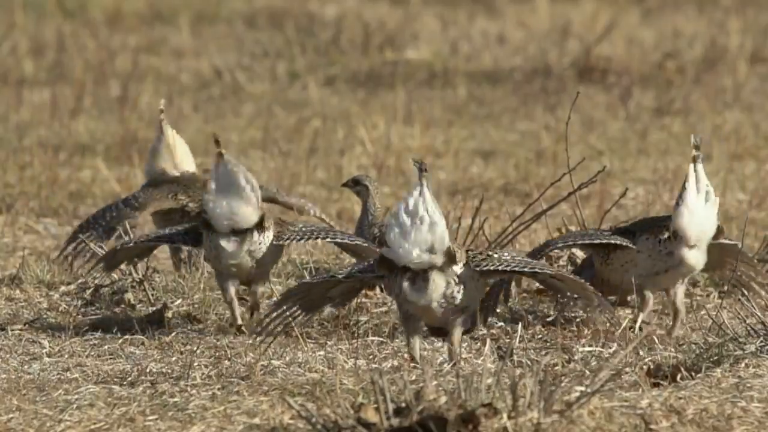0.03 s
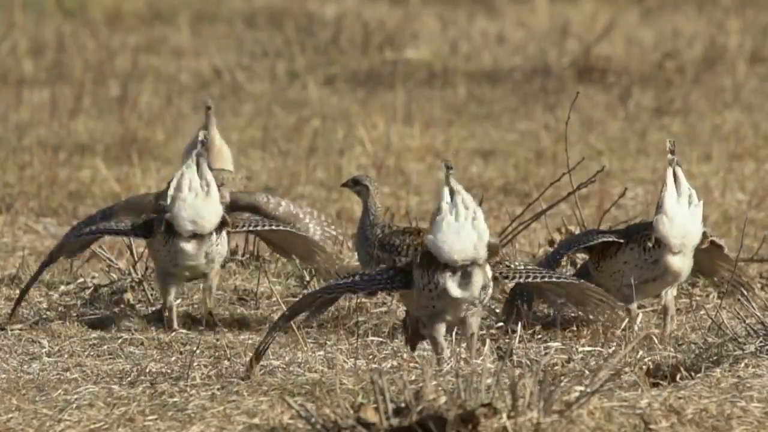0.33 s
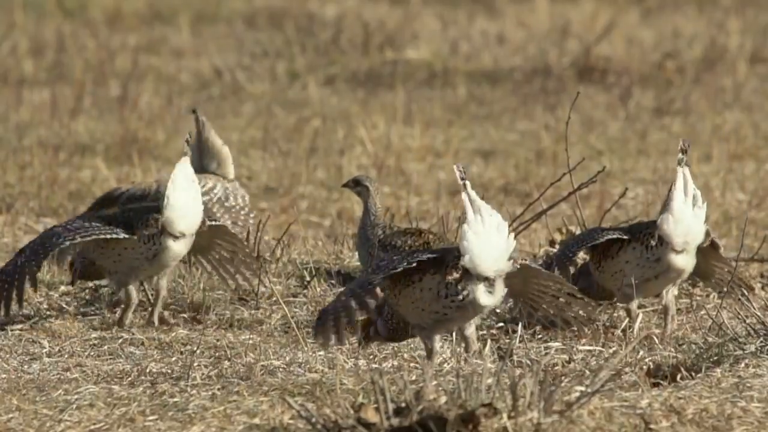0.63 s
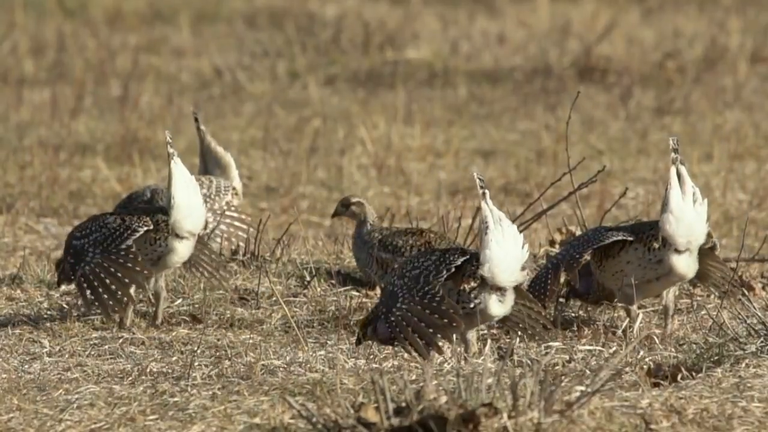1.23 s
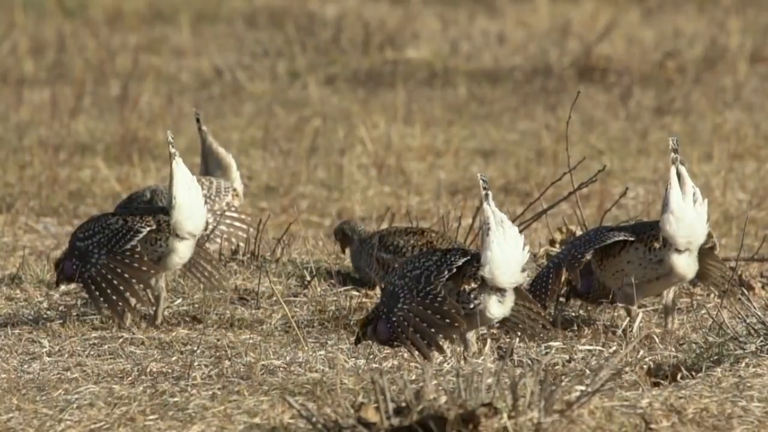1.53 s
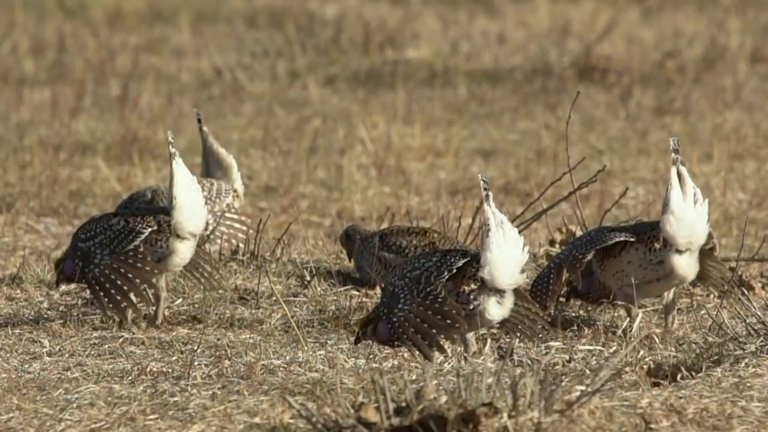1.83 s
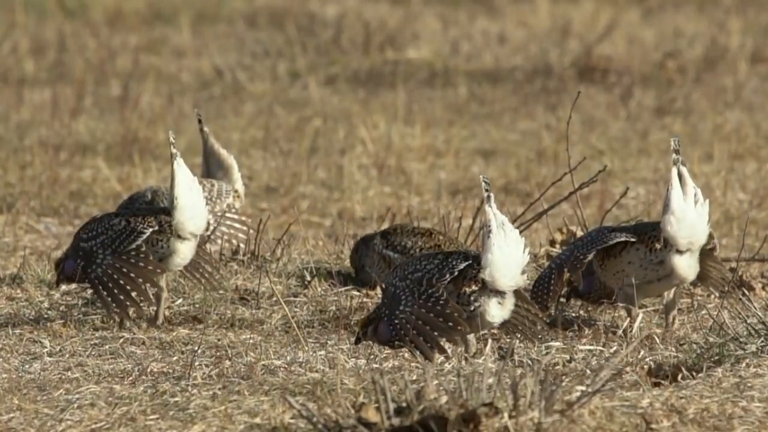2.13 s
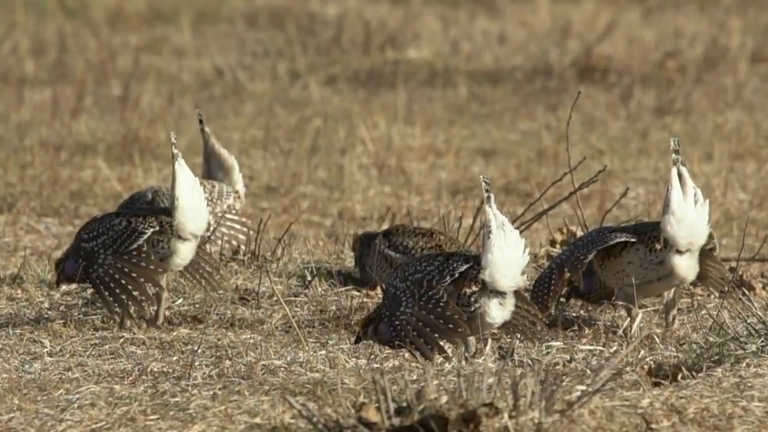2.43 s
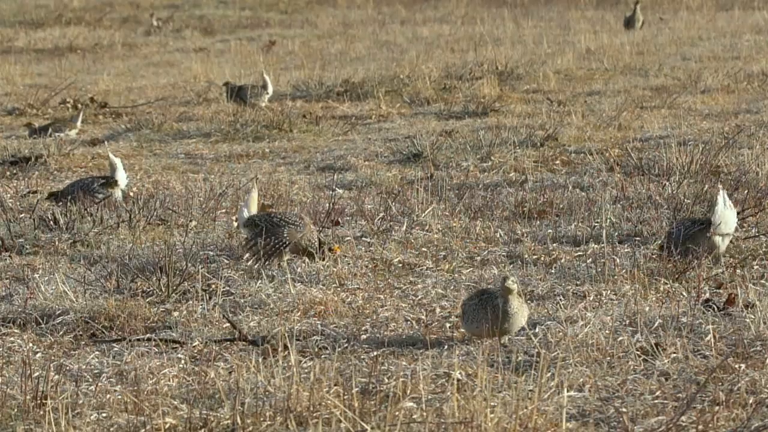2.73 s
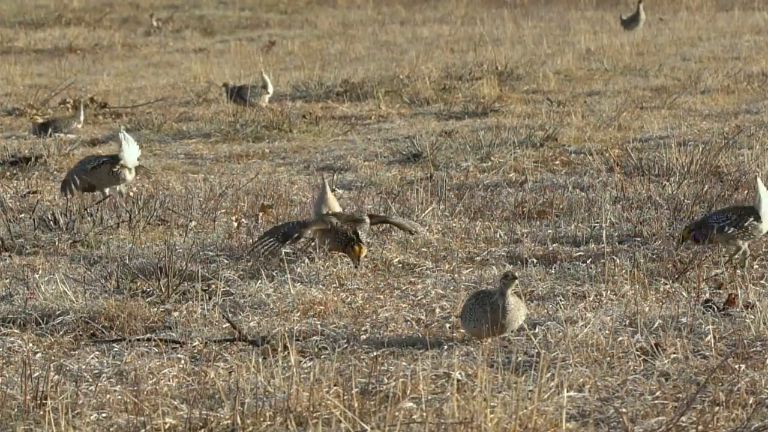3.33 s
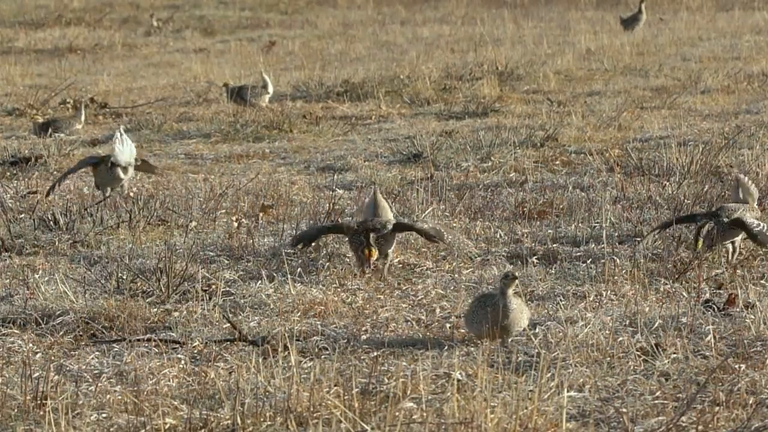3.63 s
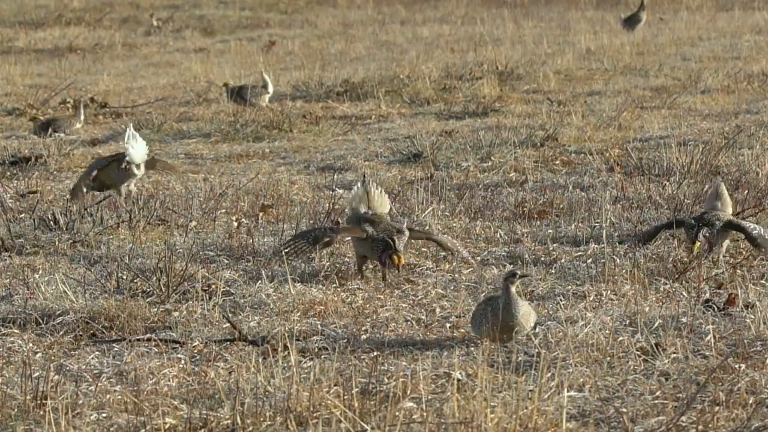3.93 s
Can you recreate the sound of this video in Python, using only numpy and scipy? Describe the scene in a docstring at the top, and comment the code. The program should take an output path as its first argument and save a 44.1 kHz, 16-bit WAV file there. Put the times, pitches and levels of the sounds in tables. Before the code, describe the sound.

Grouse dance on an open grassy field, with fast rolls of soft foot thumps, dry tail clicks, brief cackles and rustling feathers. They stop halfway, a steady hiss of air drops abruptly, then the drumming builds again with squeaks.

```python
"""Fast rolls of soft thumps and dry clicks: grouse dance on an open grassy field, stamping their feet
while their tail quills snap past each other. The birds cackle, whine and squeak, their feathers tick
and rustle, and the ground scatters a short echo of the stamps, clicks and calls. A steady hiss of air
drops away abruptly halfway, as the listening position changes to a quieter one."""
import sys
import numpy as np
from scipy import signal
from scipy.fft import rfft, irfft, next_fast_len
from scipy.io import wavfile
from scipy.ndimage import map_coordinates

SR = 44100
rng = np.random.default_rng(int(sys.argv[2]) if len(sys.argv) > 2 else 0)


def int16_out(signal):
    """Quantize to a 16-bit WAV file."""
    q = np.round(np.clip(np.atleast_2d(signal).T, -1, 1) * 32767)
    wavfile.write(sys.argv[1], SR, q.astype(np.int16))


N = 4 * SR
MOVE_S = 2.056  # the listening position changes here

# Foot stamps. Each row: time of the peak in seconds, level in dB, pitch in Hz.
STAMPS = [(0.0071, -8, 198), (0.0332, -16.5, 204), (0.0532, -12, 192), (0.0691, -15.5, 183),
          (0.1057, -15, 195), (0.1378, -13.5, 235), (0.149, -13, 180), (0.1624, -13, 165),
          (0.174, -15.5, 181), (0.201, -13.5, 183), (0.2274, -16, 180), (0.2576, -32, 201),
          (0.2806, -12, 178), (0.293, -16, 172), (0.3103, -15.5, 180), (0.3347, -12, 176),
          (0.3664, -18.5, 179), (0.3872, -15.5, 225), (0.406, -13, 184), (0.4411, -19, 192),
          (0.456, -13, 188), (0.4931, -17.5, 193), (0.5116, -13.5, 186), (0.5498, -11, 183),
          (0.5688, -21, 175), (0.6011, -14, 170), (0.622, -19, 187), (0.6542, -14.5, 201),
          (0.674, -16, 184), (0.7094, -13.5, 190), (0.7445, -24, 213), (0.7693, -15.5, 209),
          (0.7974, -16.5, 178), (0.825, -19.5, 220), (0.8573, -12.5, 200), (0.9088, -24, 198),
          (0.9342, -20.5, 185), (0.963, -20.5, 208), (0.9875, -24.5, 204), (1.0174, -19.5, 189),
          (1.0446, -24.5, 181), (1.075, -20.5, 181), (1.115, -23, 196), (1.168, -25.5, 182),
          (1.3974, -27, 173), (1.4775, -20, 181), (1.4988, -27.5, 215), (1.535, -18.5, 194),
          (1.5916, -21.5, 180), (1.647, -20, 181), (1.7142, -20.5, 183), (2.237, -50.5, 295),
          (2.4452, -42, 177), (2.4998, -42, 185), (2.552, -42, 178.4), (2.609, -40, 190), (2.665, -42, 193),
          (2.7154, -38.5, 195), (2.7844, -37, 189), (2.827, -35.5, 187), (2.8832, -34.5, 185),
          (2.9122, -32, 190), (2.9372, -34, 201), (2.969, -32, 173), (3.0224, -18, 188),
          (3.0756, -16.5, 178), (3.122, -17.5, 232), (3.1809, -21, 210), (3.233, -14.5, 211),
          (3.2883, -19, 170), (3.3396, -15.5, 227), (3.3901, -23.5, 223), (3.4473, -21, 210),
          (3.508, -14.5, 186), (3.545, -12, 212), (3.555, -19.5, 199), (3.609, -19.5, 166),
          (3.6556, -11.5, 206), (3.707, -25, 210), (3.728, -22, 172), (3.749, -26, 247), (3.7651, -16, 178),
          (3.823, -13.5, 193), (3.8468, -18, 178), (3.8776, -16, 196), (3.8968, -15, 214),
          (3.9356, -17.5, 184), (3.9909, -15.5, 185)]
# Tail quill clicks. Each row: time of the centre in seconds, level in dB, centre pitch in Hz.
CLICKS = [(0.0035, -17, 2930), (0.05, -25, 3150), (0.062, -24.5, 3140), (0.0913, -28, 3270),
          (0.104, -31, 3170), (0.116, -22, 3170), (0.129, -30, 3240), (0.1588, -27.5, 3040),
          (0.182, -25.5, 3300), (0.201, -28, 2800), (0.21, -27, 2670), (0.2248, -23.5, 3110),
          (0.268, -33, 3250), (0.279, -24, 3500), (0.3015, -22, 3100), (0.3326, -22, 3110),
          (0.373, -35, 3430), (0.3859, -23, 3300), (0.399, -26, 3030), (0.441, -22.5, 3170),
          (0.449, -23, 3180), (0.498, -19, 3580), (0.52, -24, 3350), (0.5469, -23.5, 3100),
          (0.5615, -21, 3200), (0.598, -26.5, 3100), (0.6147, -24, 3250), (0.657, -22, 3340),
          (0.6677, -24, 3360), (0.7196, -23.5, 3130), (0.7598, -26.5, 3040), (0.808, -25.5, 3500),
          (0.8244, -27, 3200), (0.8512, -26, 2930), (0.8805, -28.5, 2980), (0.9087, -28, 3100),
          (0.9348, -31.5, 3270), (0.9546, -25, 3110), (0.9864, -34, 3180), (1.0067, -23.5, 3040),
          (1.0185, -26, 3300), (1.0398, -26.5, 3000), (1.059, -24.5, 3210), (1.1137, -23, 3270),
          (1.1688, -26.5, 2950), (1.478, -32.5, 3300), (1.533, -28.5, 2860), (1.5923, -35, 3270),
          (1.648, -27, 3120), (1.7132, -36.5, 3230), (2.4454, -55, 3050), (2.4993, -52, 3050),
          (2.5532, -51, 3060), (2.607, -50.5, 3100), (2.6616, -49, 2920), (2.717, -49.5, 3100),
          (2.7715, -45.5, 2920), (2.8275, -44, 3090), (2.8807, -45.5, 3050), (2.9107, -45, 3200),
          (2.95, -44, 3150), (2.9882, -44.5, 3040), (3.018, -35, 3300), (3.0421, -43.5, 2950),
          (3.072, -42, 3500), (3.1233, -26, 3140), (3.1773, -29, 3530), (3.2318, -30, 3420),
          (3.3352, -19, 3140), (3.3883, -26.5, 3170), (3.442, -18.5, 3210), (3.503, -31, 3400),
          (3.5492, -20, 3070), (3.6025, -18, 3400), (3.648, -28.5, 3360), (3.6543, -19.5, 3170),
          (3.707, -20.5, 3320), (3.7426, -23.5, 3800), (3.7936, -19, 3500), (3.8444, -19.5, 3310),
          (3.8635, -20, 3170), (3.8768, -27, 3330), (3.896, -21, 3640), (3.9187, -20.5, 3300),
          (3.948, -21.5, 3240), (3.97, -14.5, 3140)]
# Spectrum of quills scraping. Each row: frequency in Hz, relative level in dB.
SCRAPE_SPECTRUM = [(800, -55), (1900, -14.5), (2400, -8.5), (3100, 14), (3700, 2), (4400, -21.5),
                   (7500, -30.5), (10000, -49.5), (15000, -65)]
# Cackles. Each row: start in seconds, length in seconds, first, middle and last pitch of the glide in
# Hz, level in dB, throat resonance in Hz, added fundamental in dB, roughness from 0 to 1, added
# overtones in dB.
CACKLES = [ (0.242, 0.047, 297, 277.4, 266, -27, 1150, 10, 0.25, -19),
           (0.43, 0.063, 475, 375.5, 319, -28.5, 1150, 0.5, 0.14, -22),
           (0.541, 0.047, 295, 259, 237, -27.5, 1246, -1, 0.52, -16),
           (0.592, 0.05, 320, 276, 270, -35, 1330, 5, 0.3, -11),
           (0.81, 0.057, 501, 439.2, 346, -22, 1373, -8, 0.37, -21.5),
           (0.848, 0.08, 404, 366, 322, -27, 1120, -8.5, 0.02, -21),
           (1.484, 0.022, 403, 394, 350, -37.5, 1190, 26, 0.54, -37),
           (2.892, 0.029, 452, 406, 380, -45.5, 1200, -29, 0.1, -22),
           (3.029, 0.025, 377, 393, 428, -42, 997, 2.5, 0.48, -28),
           (3.059, 0.042, 562, 522, 480, -37, 1016, 0, 0.31, -20),
           (3.254, 0.039, 550, 461.7, 394, -32, 845, -20, 0.46, -32),
           (3.315, 0.086, 443, 397.2, 303, -41.5, 1186, 7.5, 0.17, -10),
           (3.361, .07, 375, 323.4, 264, -53, 1300, 4, 0.17, -27),
           (3.447, 0.024, 364, 391, 415, -38.5, 795, -11, 0.6, -36),
           (3.496, 0.05, 475, 491, 416, -24, 890, -23, 0.24, -31),
           (3.777, 0.035, 586, 499, 384, -22, 946, -16, 0.31, -30),
           (3.798, 0.038, 368, 352.7, 318, -23, 769, 5.5, 0.32, -6),
           (3.979, 0.022, 434, 365, 300, -29, 1250, 2, 0.65, -13)]
# Whines. Each row: start in seconds, length in seconds, first, middle and last pitch in Hz, level in dB.
WHINES = [ (.006, 0.03, 1205, 1240, 950, -38.5), (0.216, 0.022, 1450, 1007, 840, -30),
          (0.314, 0.022, 410, 597, 704, -42), (0.647, 0.029, 447, 686, 740, -40),
          (0.782, 0.045, 1078, 1620, 1340, -38), (1.019, 0.026, 875, 1210, 1560, -48),
          (0.51, 0.03, 470, 643, 620, -39), (1.102, 0.045, 1535, 1485, 970, -46),
          (1.149, 0.055, 946, 1120, 890, -46), (1.707, 0.054, 1590, 1569, 1084, -39),
          (2.19, .06, 2070, 2150, 2060, -75.5), (2.516, 0.072, 904, 1042, 945, -63.5),
          (2.692, 0.069, 1060, 1168, 1086, -59), (2.842, 0.024, 1010, 1210, 1370, -59),
          (3.754, 0.022, 450, 636, 710, -39.5), (3.827, 0.025, 1040, 873, 770, -41),
          (3.858, 0.036, 1570, 1115, 1070, -53)]
# Squeaks. Each row: start in seconds, length in seconds, first, middle and last pitch in Hz, levels of
# harmonics 1, 2 and 3 in dB.
SQUEAKS = [ (3.236, 0.025, 2480, 2630, 2330, -77, -70, -54),
           (3.294, 0.015, 2340, 2484, 2720, -39.5, -52, -62),
           (3.307, 0.014, 3870, 3937, 3770, -31.5, -36, -80),
           (3.468, 0.027, 2690, 2790, 2930, -55, -50, -43.5),
           (3.747, 0.024, 2610, 2760, 3030, -45, -47.5, -48),
           (3.771, 0.014, 2580, 2856, 3120, -17.5, -31.5, -62),
           (3.777, 0.034, 3800, 3963, 3780, -27.5, -63, -74),
           (3.832, 0.03, 2225, 2327, 2385, -35.5, -46, -68)]
# Wing feather snaps. Each row: time of the peak in seconds, level in dB.
SNAPS = [(0.06, -34.5), (.125, -32), (.427, -26.5), (0.437, -29.5), (0.497, -29), (0.506, -24.5),
         (0.637, -28.5), (0.74, -30.5), (0.784, -28.5), (0.852, -27.5), (3.266, -44.5), (3.661, -40),
         (3.741, -48)]
# Spectrum of a snap. Each row: frequency in Hz, relative level in dB.
SNAP_SPECTRUM = [(1000, -25), (2500, 5.5), (4700, 2.5), (6300, -2.5), (7800, -5), (9500, -20), (15000, -42)]
# Loudness contour of the dancers' rustle. Each row: time in seconds, level in dB.
RUSTLE_LEVELS = [(0, -34), (.6, -35), (.9, -38.5), (1.2, -51.5), (1.5, -56), (1.8, -48), (2.1, -95.5),
                 (2.45, -75), (2.85, -61.5), (3.1, -55), (3.4, -52.5), (3.7, -49.5), (3.82, -44),
                 (4, -49.5)]
# Spectrum of rustling feathers. Each row: frequency in Hz, relative level in dB.
FEATHER_SPECTRUM = [(45, -33), (180, 13), (400, 8), (700, -4.5), (1800, -18), (2500, -4), (3200, -0.5),
                    (3800, -3.5), (4400, -8), (7500, -14), (10000, -23), (15000, -44)]
# Spectra of the air at the two listening positions. Each row: frequency in Hz, relative level in dB.
FIRST_AIR_SPECTRUM = [(25, -19), (60, -1), (130, -1), (220, -12.5), (350, -15.5), (700, -19), (2100, -18),
                      (3500, -16), (6900, -14), (10200, -18.5), (15500, -32)]
SECOND_AIR_SPECTRUM = [(25, -38), (90, -8), (240, -3), (400, -6.5), (700, -10.5), (1500, -17),
                       (3000, -16.5), (7000, -20), (10000, -25.5), (15500, -37)]
# Decay of the field's echo. Each row: frequency in Hz, time to fall by 60 dB in seconds.
FIELD_DECAY = [(150, 0.18), (1000, 0.05), (3200, 0.069), (10000, 0.044)]


def foot_stamps(rise_s=.0051, fall_s=.006, trim_db=-.8):
    """Impact: a foot on the ground excites a heavily damped vibration, a soft thump of a few cycles."""
    out = np.zeros(N)
    t = np.arange(-SR // 40, SR // 25) / SR
    envelope = 1 / np.cosh(t / np.where(t < 0, rise_s, fall_s)) ** 2
    for peak_s, db, hz in STAMPS:
        thump = -amp(db + trim_db) * envelope * np.cos(2 * np.pi * hz * t)
        add(out, peak_s + t[0], ground_echo(thump, echo_db=-12))
    return out


def tail_clicks(gap_s=.001661, ring_s=.00096, scrape_s=.0018, pitch_step=.054, trim_db=-1.5):
    """Friction and release: three quills scrape and snap in quick succession, tending up in pitch."""
    out = np.zeros(N)
    t = np.arange(-SR // 100, SR // 100) / SR
    scrape = noise(SCRAPE_SPECTRUM)
    for centre_s, db, hz in CLICKS:
        offset = int(rng.random() * (N - len(t)))
        click = amp(-7) * pulse(t, scrape_s) * scrape[offset:offset + len(t)]
        for quill in (-1, 0, 1):
            late, detune, size, cycles = rng.standard_normal(4)
            quill_t = t - gap_s * (quill + .228 * late)
            quill_hz = hz * (1 + pitch_step * quill + .033 * detune)
            gain = amp(-5 * abs(quill) - .5 * size)  # the outer quills are weaker
            click += gain * pulse(quill_t, ring_s) * np.cos(2 * np.pi * (quill_hz * quill_t + cycles))
        echo_db = -7 if centre_s > MOVE_S else -12  # more echo at the second, farther position
        add(out, centre_s + t[0], ground_echo(amp(db + trim_db) * click, echo_db))
    return out


def cackles(swoop=.22, swoop_s=.006, throat_width_hz=260, throat_tracking=.85, rasp_db=-4):
    """Source and filter: a swooping harmonic voice sounds through a throat resonance that follows it."""
    out = np.zeros(N)
    harmonic = np.arange(1, 13)[:, None]
    for start, length, first, middle, last, db, throat_hz, fundamental_db, rough, overtone_db in CACKLES:
        t, hz, envelope = glide(length, (first, middle, last), attack_s=.014, release_s=.018)
        hz = hz * (1 + swoop * np.exp(-t / swoop_s))  # the onset drops onto the glide from above
        phase = jittered_phase(t, hz, depth=.1 * rough, rate=400)
        resonance_hz = throat_hz * (hz / middle) ** throat_tracking
        partial_hz = harmonic * hz
        formant = 1 / (1 + ((partial_hz - resonance_hz) / throat_width_hz) ** 2) ** 1.5
        formant /= 1 + (partial_hz / (1.12 * resonance_hz)) ** 10  # steep fall above the resonance
        overtones = amp(overtone_db) / (1 + (partial_hz / (1.6 * resonance_hz)) ** 6)
        gains = formant + amp(fundamental_db) * (harmonic == 1) + overtones
        # Rough calls rasp with a noise band at the resonance, and their amplitude shakes.
        rasp = unit(wobble(t, rate=600) * np.sin(2 * np.pi * np.cumsum(resonance_hz) / SR))
        shake = 1 + rough * wobble(t, rate=271)
        voice = unit((gains * np.sin(harmonic * phase)).sum(0) * shake)
        call = amp(db) * envelope * unit(voice + amp(rasp_db) * rough * rasp)
        add(out, start, ground_echo(call, echo_db=-6.5))
    return out


def whines(octave_db=-17):
    """Nearly sinusoidal oscillation: a thin, gliding note carries only a weak second harmonic."""
    out = np.zeros(N)
    for start, length, *pitches, db in WHINES:
        t, hz, envelope = glide(length, pitches, attack_s=.01, release_s=.0043)
        phase = jittered_phase(t, hz, depth=.0029, rate=232)
        voice = unit(np.sin(phase) + amp(octave_db) * np.sin(2 * phase))
        add(out, start, ground_echo(amp(db) * envelope * voice, echo_db=-6.5))
    return out


def squeaks():
    """Superposition: three harmonics of one high, gliding pitch add up to a brief whistle."""
    out = np.zeros(N)
    for start, length, first, middle, last, *levels in SQUEAKS:
        t, hz, envelope = glide(length, (first, middle, last), attack_s=.0056, release_s=.0056)
        phase = jittered_phase(t, hz, depth=.008, rate=454)
        voice = sum(amp(db) * np.sin(harmonic * phase) for harmonic, db in enumerate(levels, 1))
        add(out, start, ground_echo(envelope * voice, echo_db=-9.5))
    return out


def wing_snaps(width_s=.0015):
    """Impulsive excitation: stiff wing feathers give brief, broadband bursts, heard as bright ticks."""
    t = np.arange(N) / SR
    envelope = sum(amp(db) * pulse(t - peak_s, width_s) for peak_s, db in SNAPS)
    return noise(SNAP_SPECTRUM) * envelope


def feather_rustle(barb_hz=4000, crackle_db=3.2, flutter_db=1.8):
    """Amplitude-modulated noise: feathers flutter and their barbs crackle, louder as more birds dance."""
    t = np.arange(N) / SR
    feathers = noise(FEATHER_SPECTRUM)
    barbs = filtered(feathers, lambda hz: hz ** 4 / (hz ** 4 + barb_hz ** 4))
    crackle = unit(amp(crackle_db * wobble(t, rate=700)))
    level_db = np.interp(t, *np.transpose(RUSTLE_LEVELS)) + flutter_db * wobble(t, rate=140)
    return amp(level_db) * (feathers + barbs * (crackle - 1))


def air_hiss(first_db=-45.5, second_db=-64.5, crossfade_s=.008):
    """Stationary noise: the air hisses steadily at each position, far more weakly at the second."""
    t = np.arange(N) / SR
    first_share = np.clip((MOVE_S - t) / crossfade_s + .5, 0, 1)
    first_air = amp(first_db) * noise(FIRST_AIR_SPECTRUM)
    second_air = amp(second_db) * noise(SECOND_AIR_SPECTRUM)
    return first_share * first_air + (1 - first_share) * second_air


def ground_echo(direct, echo_db, build_s=.0031):
    """Scattering: grass and ground follow the direct sound with a diffuse tail, longest in the bass."""
    hz, t, spectra = signal.stft(rng.standard_normal(SR // 5), SR, nperseg=256)
    decay = amp(-60 * t / along(FIELD_DECAY, hz)[:, None])
    tail = signal.istft(spectra * decay, SR, nperseg=256)[1]
    tail *= 1 - np.exp(-(np.arange(len(tail)) / SR / build_s) ** 2)
    response = amp(echo_db) * tail / np.linalg.norm(tail)
    response[0] = 1  # the direct path
    return signal.fftconvolve(direct, response)


def glide(length, pitches, attack_s, release_s):
    """Frequency glide: time, pitch and envelope of a call whose log pitch is a three-point parabola."""
    t = np.arange(int(length * SR)) / SR
    parabola = np.polyfit([0, .5, 1], np.log(pitches), 2)
    hz = np.exp(np.polyval(parabola, t / length))
    fade = lambda u: np.sin(np.pi / 2 * np.clip(u, 0, 1)) ** 2
    return t, hz, fade(t / attack_s) * fade((length - t) / release_s)


def jittered_phase(t, hz, depth, rate):
    """Phase is the integral of frequency, here of a pitch that wavers at random."""
    return 2 * np.pi * np.cumsum(hz * (1 + depth * wobble(t, rate))) / SR


def pulse(t, width_s):
    """A Gaussian envelope peaks at time zero."""
    return np.exp(-.5 * (t / width_s) ** 2)


def wobble(t, rate):
    """Spline interpolation joins random knots, rate of them a second, into a smooth curve."""
    return map_coordinates(rng.standard_normal(1024), [t * rate], mode="wrap")


def noise(spectrum):
    """Spectral shaping turns white noise into coloured noise of rms 1."""
    return unit(filtered(rng.standard_normal(N), lambda hz: amp(along(spectrum, hz))))


def filtered(x, response):
    """Linear filtering multiplies the spectrum by a frequency response."""
    size = next_fast_len(N + SR // 2)
    return irfft(rfft(x, size) * response(np.fft.rfftfreq(size, 1 / SR)), size)[:N]


def along(points, hz):
    """Interpolation joins (Hz, value) points on a logarithmic frequency axis."""
    point_hz, values = np.transpose(points)
    return np.interp(np.log(hz + 1), np.log(point_hz + 1), values)


def amp(db):
    """Amplitude grows tenfold for every 20 dB."""
    return 10 ** (np.asarray(db) / 20)


def unit(x):
    """Normalisation scales a signal to rms 1."""
    return x / np.sqrt(np.mean(x ** 2) + 1e-20)


def add(out, start_s, x):
    """Superposition adds x into out from start_s onward."""
    i = int(round(start_s * SR))
    x = x[max(0, -i):max(0, N - i)]
    out[max(i, 0):max(i, 0) + len(x)] += x


def scene():
    """Sound pressures add: the dancers and the air sum to one mono channel."""
    dancers = foot_stamps() + tail_clicks() + cackles() + whines() + squeaks() + wing_snaps()
    return (dancers + feather_rustle() + air_hiss())[None]


def record(dry, bass_hz=55, top_hz=15720):
    """Band limiting: a first-order high-pass thins the deepest bass, and nothing passes above top_hz."""
    return filtered(dry[0], lambda hz: (hz < top_hz) * hz / np.hypot(hz, bass_hz))[None]


dry = scene()
out = record(dry)
int16_out(out)
```